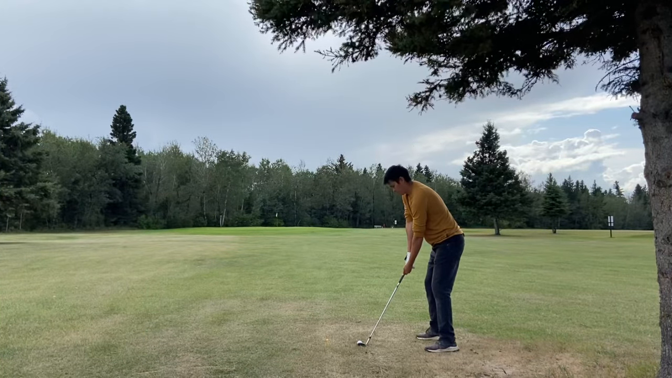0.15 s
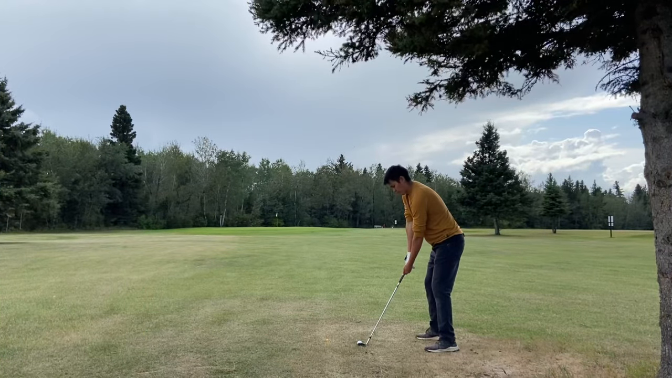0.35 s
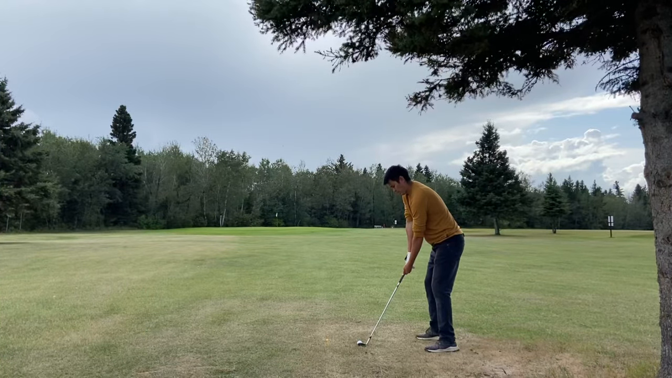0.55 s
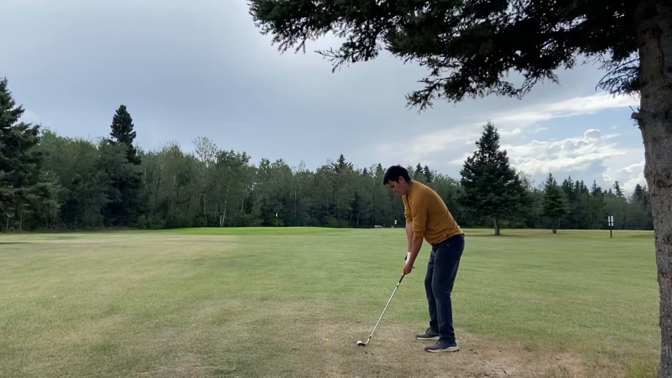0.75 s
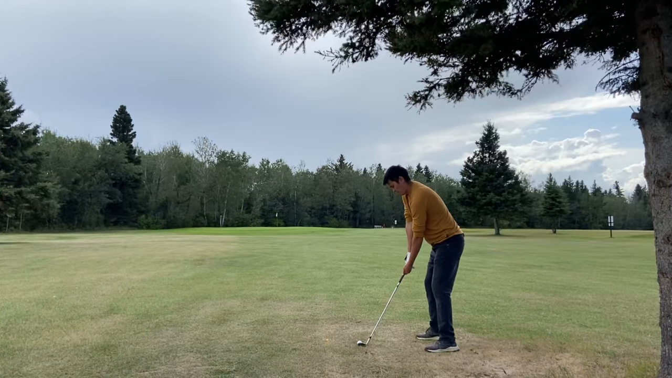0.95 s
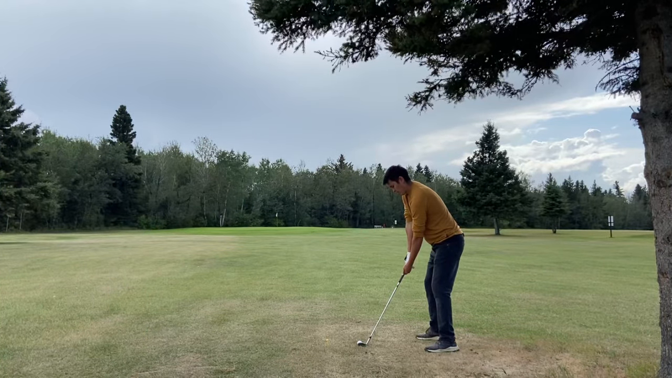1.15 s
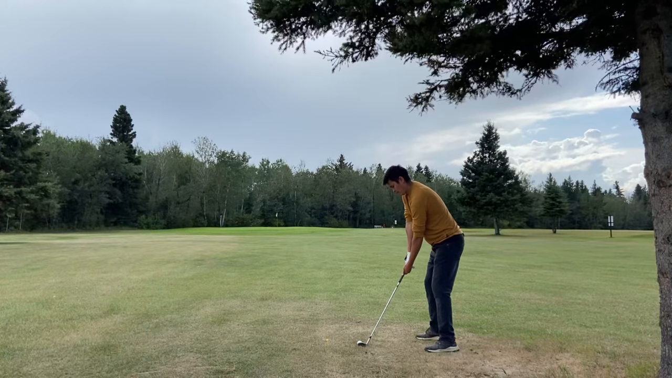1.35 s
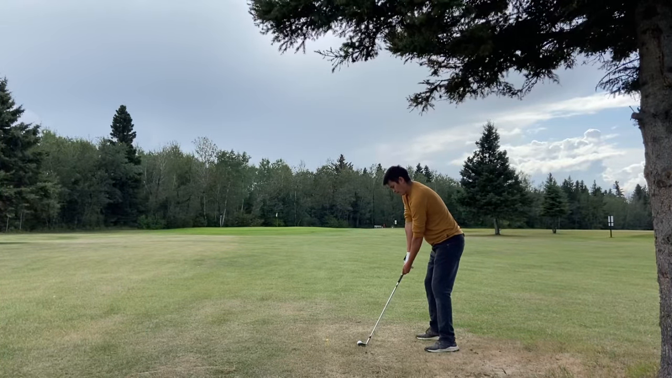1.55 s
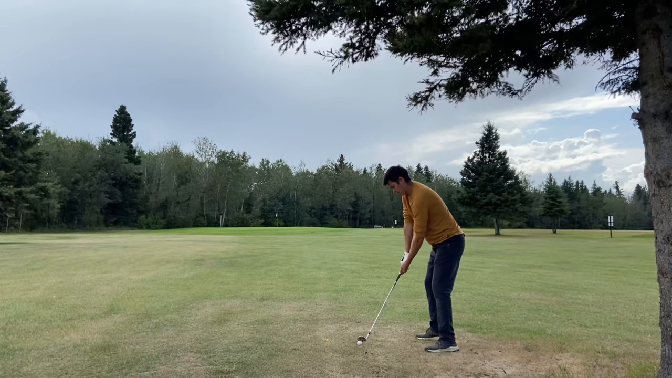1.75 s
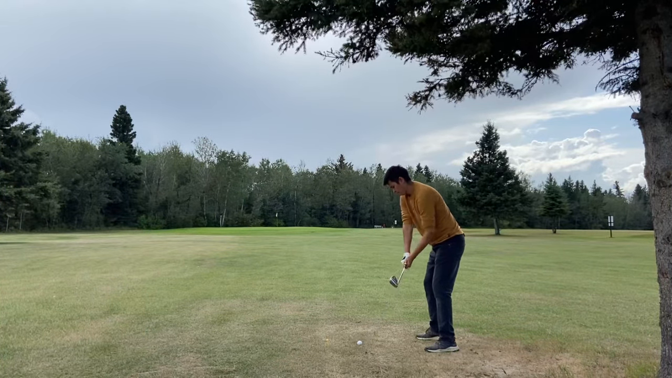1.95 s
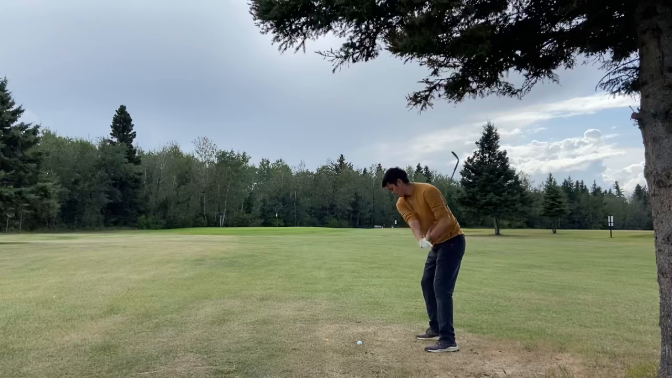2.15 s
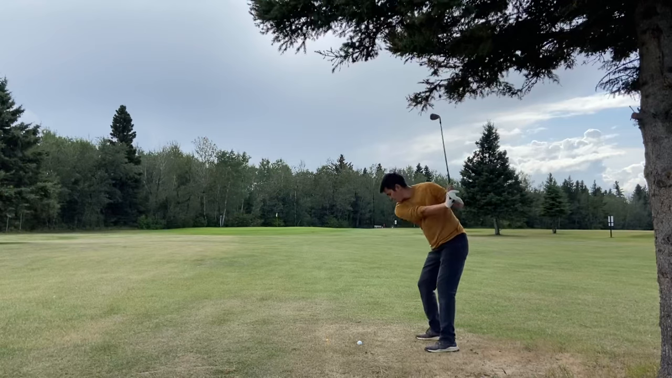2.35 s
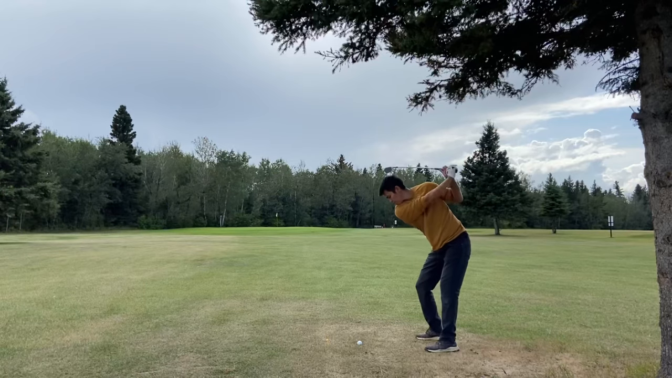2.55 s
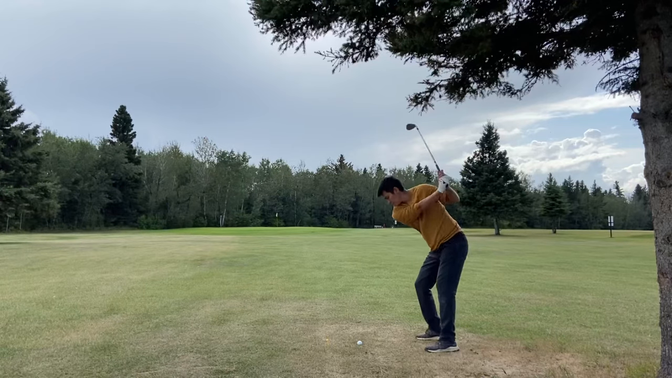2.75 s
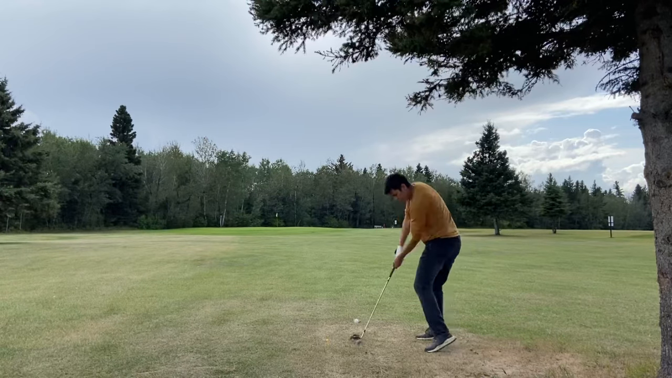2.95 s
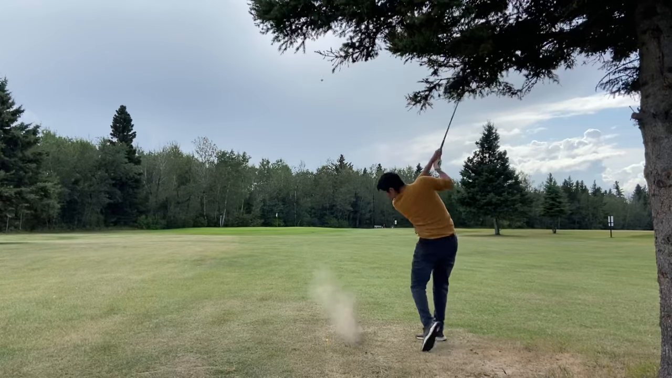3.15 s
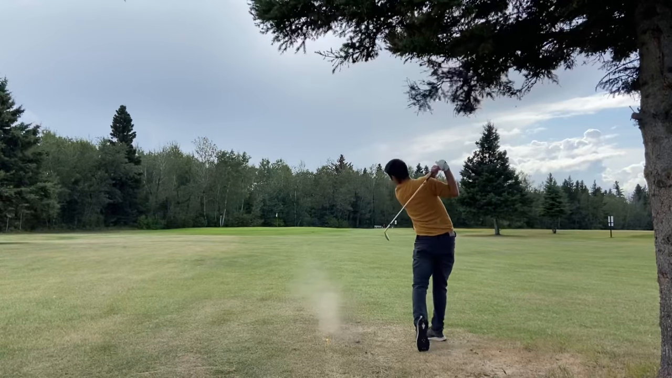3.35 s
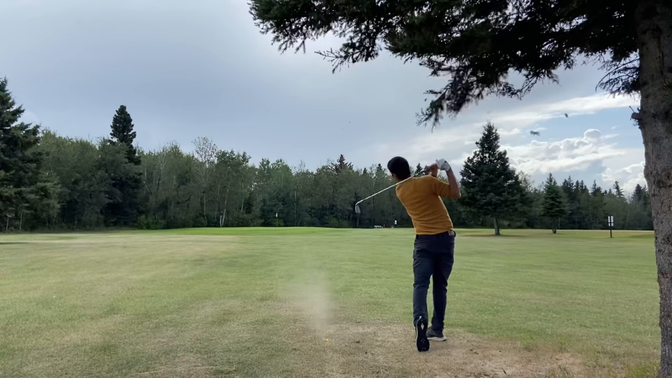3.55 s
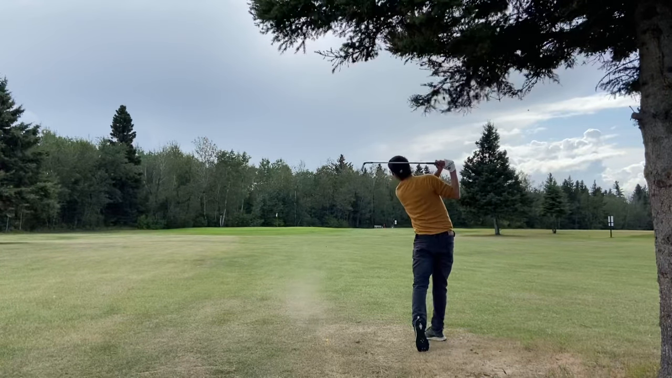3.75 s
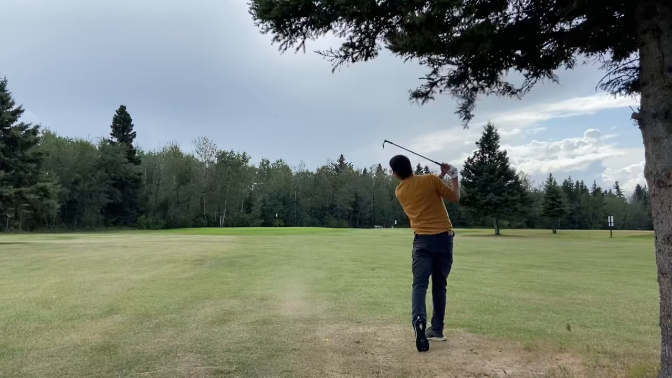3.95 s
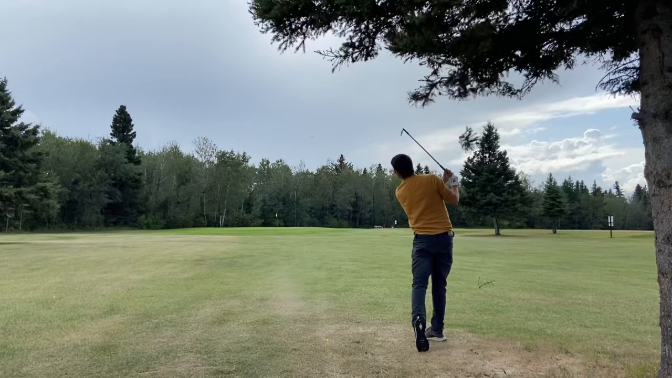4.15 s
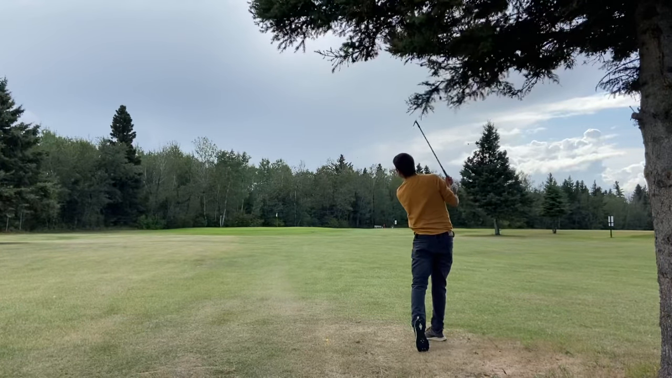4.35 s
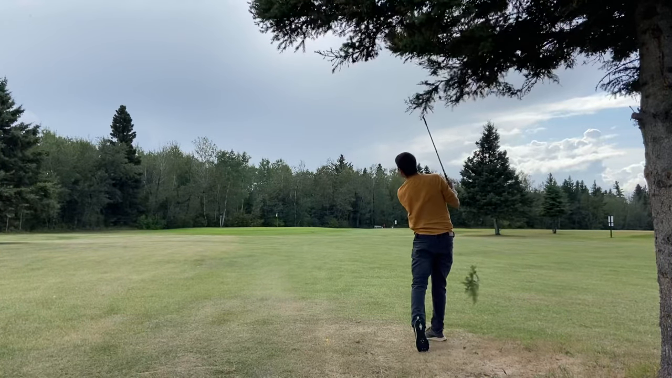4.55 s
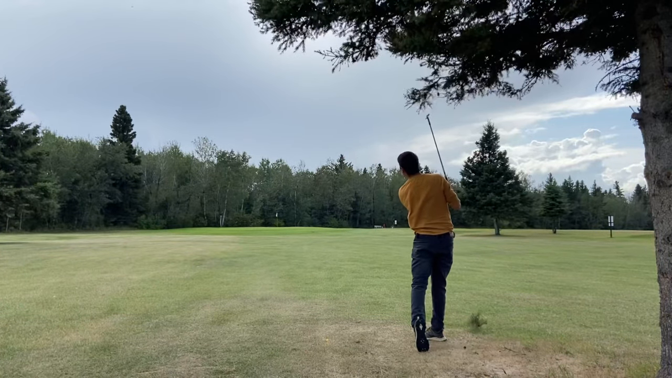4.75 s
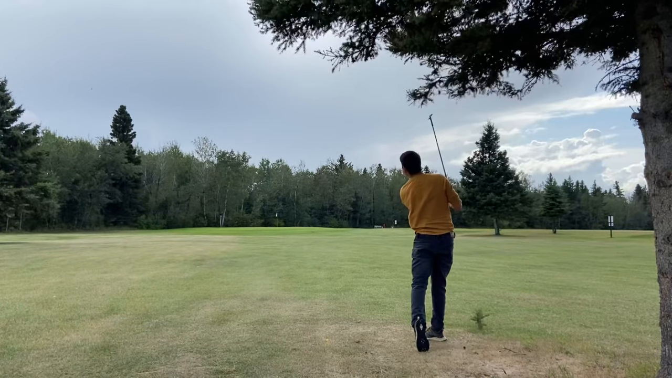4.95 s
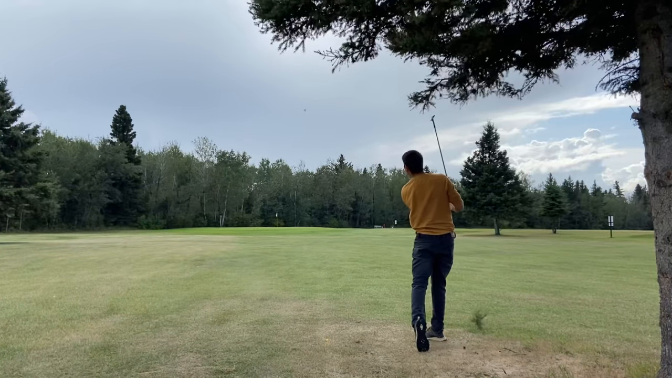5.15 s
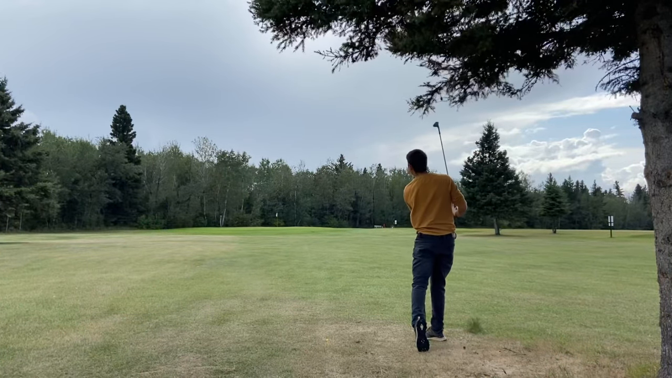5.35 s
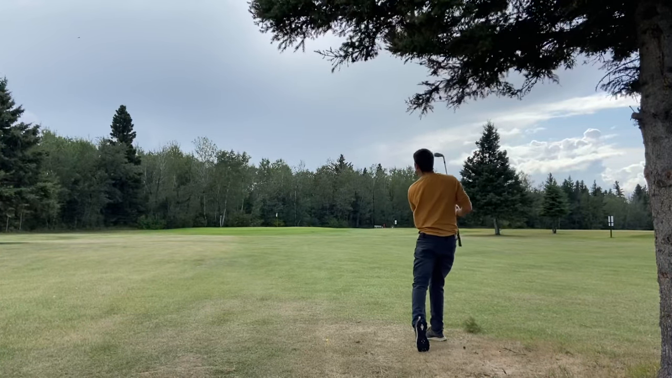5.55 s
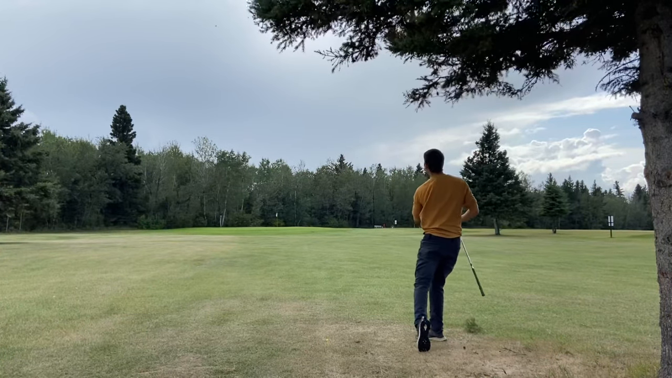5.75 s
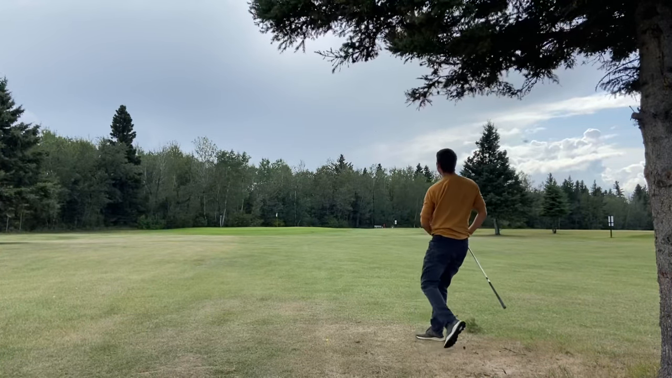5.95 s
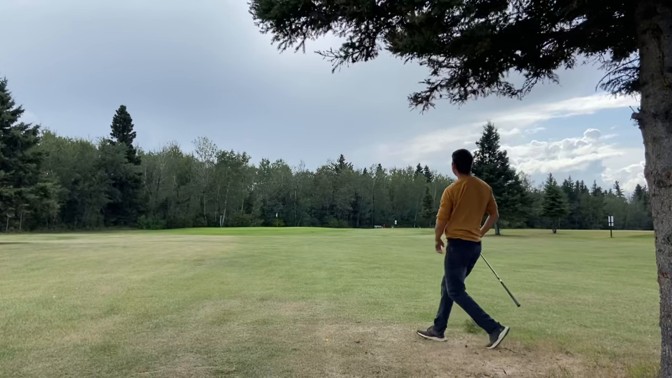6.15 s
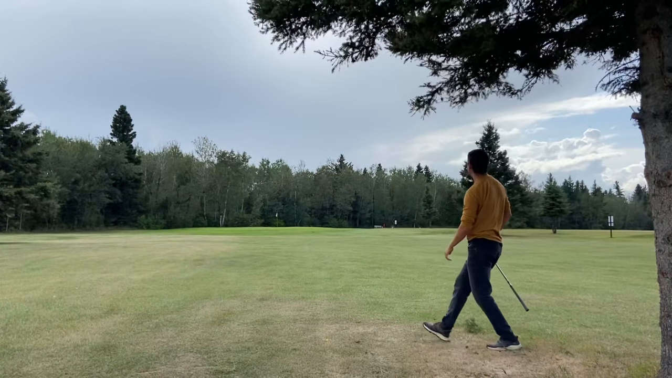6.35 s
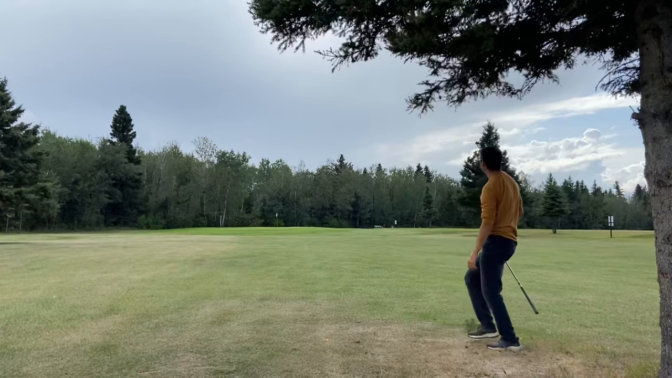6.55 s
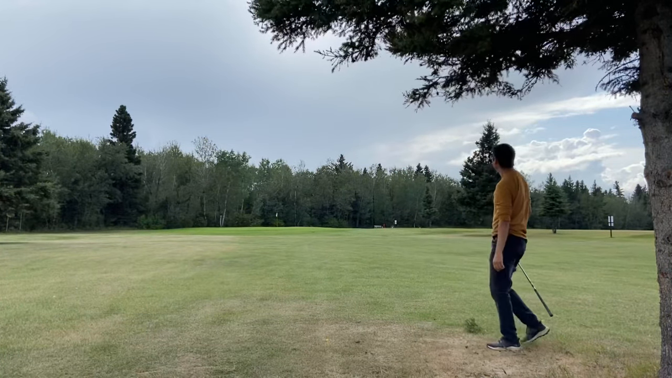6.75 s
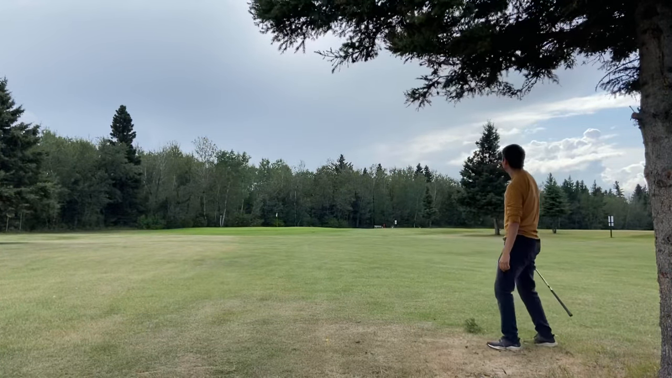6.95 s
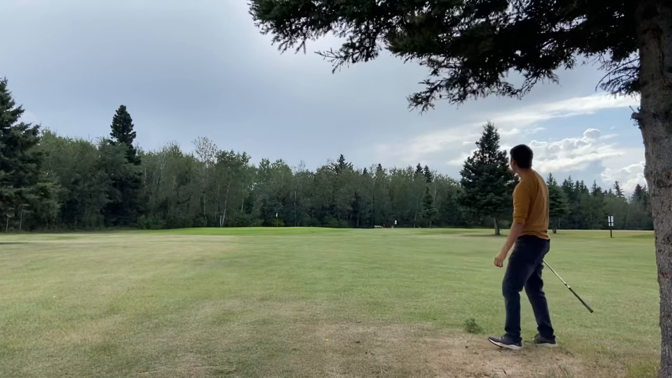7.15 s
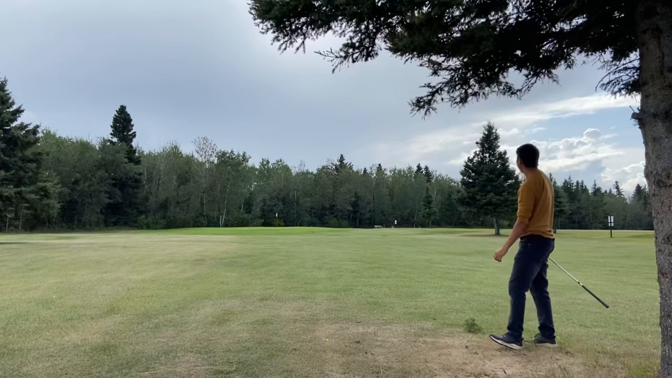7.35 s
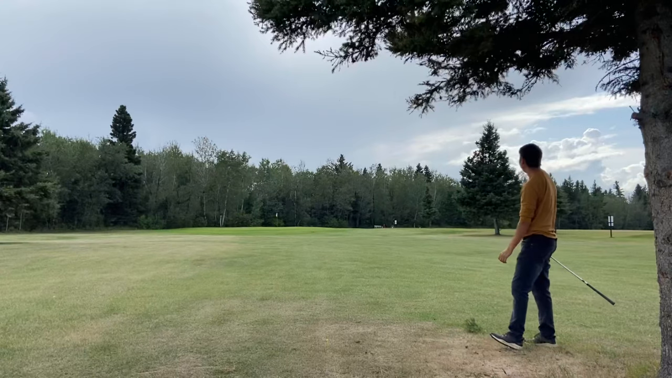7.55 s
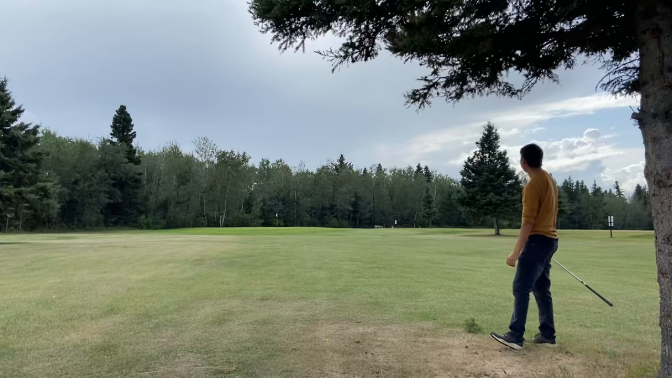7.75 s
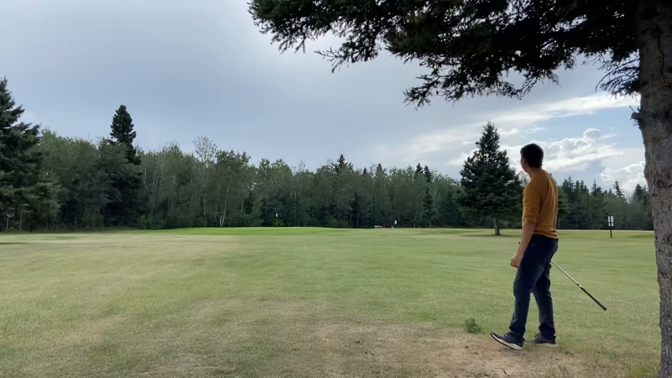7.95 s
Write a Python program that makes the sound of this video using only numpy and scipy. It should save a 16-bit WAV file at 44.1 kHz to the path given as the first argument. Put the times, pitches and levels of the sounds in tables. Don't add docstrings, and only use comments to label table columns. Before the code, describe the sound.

A quiet, windy open field beneath a spruce, heard from a few metres behind a golfer. Soft buffeting comes first, then a short rising swish, a hard, dry, slightly overloaded crack and a gritty spray of soil. Almost at once a woody snap and bright needle rattle answer from the tree. Falling debris ticks on dry litter, a strong low wind thump arrives later, and the breeze steadily swells.

```python
import sys
import numpy as np
from scipy import signal
from scipy.fft import rfft, irfft, next_fast_len
from scipy.io import wavfile
from scipy.ndimage import uniform_filter1d, map_coordinates

SR = 44100
rng = np.random.default_rng(int(sys.argv[2]) if len(sys.argv) > 2 else 0)


def wrap_up_sound(samples):
    columns = np.atleast_2d(samples).T
    tamed = np.clip(columns, -1, 1)
    steps = np.round(tamed * 32767).astype(np.int16)
    wavfile.write(sys.argv[1], SR, steps)


def gain_from_db(level_db):
    decades = np.asarray(level_db, float) / 20
    return 10 ** decades


N = 353152
CLOCK = np.arange(N) / SR
STRIKE_S = 2.9415


def unit(x):
    return x / np.sqrt(np.mean(x ** 2) + 1e-20)


def along(points, hz):
    f, value = np.transpose(points)
    return np.interp(np.log(hz + 1), np.log(f + 1), value)


def curve(points):
    s, value = np.transpose(points)
    return np.interp(CLOCK, s, value)


def wobble(rate):
    knots = rng.standard_normal(int(N * rate / SR) + 4)
    return map_coordinates(knots, [np.arange(N) * rate / SR])


def filtered(x, response):
    m = next_fast_len(N + 8192)
    return irfft(rfft(x, m) * response(np.fft.rfftfreq(m, 1 / SR)), m)[..., :N]


# hz, likeness (0 to 1)
ALIKE = [(30, .88), (80, .8), (300, .55), (1400, .32), (3000, .62), (5500, .7), (6800, .99), (16000, .99)]


def rush(spectrum, grain_db=0, grain_rate=300, spread=1, patchy_db=0):
    pair = rng.standard_normal((2, N))
    if patchy_db:
        z = signal.stft(pair, nperseg=512)[2]
        patches = uniform_filter1d(rng.standard_normal(z.shape[1:]), size=2, axis=0)
        patches = uniform_filter1d(patches, size=6, axis=1)
        pair = signal.istft(z * gain_from_db(patchy_db * unit(patches)), nperseg=512)[1][:, :N]
    if grain_db:
        pair = pair * gain_from_db(grain_db * wobble(grain_rate))

    def response(hz):
        turn = spread * np.arccos(np.clip(along(ALIKE, hz), 0, 1)) / 2
        return gain_from_db(along(spectrum, hz)) * [np.cos(turn), np.sin(turn)]

    mid, side = filtered(pair, response)
    return unit(np.array([mid + side, mid - side]))


def add(track, s, sound):
    track[round(s * SR):][:len(sound)] += sound


def swells(rows):
    power = np.zeros(N + 4 * SR)
    for s, db, half in rows:
        t = np.arange(-round(3 * half * SR), round(3 * half * SR)) / SR
        add(power, s + 2 + t[0], (gain_from_db(db) * np.exp(-(t / half) ** 2)) ** 2)
    return np.sqrt(power[2 * SR:][:N])


def bursts(rows):
    size, t = np.zeros(N + SR), np.arange(SR // 2) / SR
    for s, db, rise, t60 in rows:
        add(size, s, gain_from_db(db - 60 * t / t60) * (1 - np.exp(-t / rise)))
    return size[:N]


# pitch_hz, level_db, time to fall 60 dB decay_s
HEAD = [(7050, -3.5, 0.0079), (5600, -8.5, 0.011), (4230, -2.5, 0.01), (3550, -9.5, 0.027),
        (2734, -7, 0.025), (2120, -5, 0.022), (1690, -1, 0.021), (1400, 2, 0.017), (1060, -6, 0.025),
        (657, -20.5, 0.024), (448, -11, 0.027), (300, -11.5, 0.033), (158, -9.5, 0.045)]
# hz, level per hz_db
DIRT = [(80, -48), (300, 5.5), (1200, 4), (2500, 0.5), (4000, -2), (6000, -4), (10000, -3.5), (16000, -19)]
GRAZE_S, GRAZE_DB = .0045, -25
SPRAY_DB, SPRAY_RISE_S, SPRAY_T60_S, SPRAY_LASTS_S = -20, .001, .07, .043
DUST_DB, DUST_T60_S = -48.5, 0.72
GRIT_HZ, GRIT_WIDTH_HZ = 4000, 1200
GRIT_DB, GRIT_RISE_S, GRIT_T60_S = -25, .015, .17


def shot():
    blow, t = np.zeros(N), np.arange(SR // 10) / SR
    for hz, db, t60 in HEAD:
        start = STRIKE_S + .76 / hz
        add(blow, start, gain_from_db(db - 60 * t / t60) * np.sin(2 * np.pi * hz * t))
    crack = gain_from_db(-8 - 60 * t / .007) * rng.standard_normal(len(t))
    add(blow, STRIKE_S, crack)

    thrown = np.exp(-(np.maximum(CLOCK - STRIKE_S, 0) / SPRAY_LASTS_S) ** 4)
    graze = bursts([(STRIKE_S - GRAZE_S, GRAZE_DB, GRAZE_S / 2, SPRAY_T60_S)])
    spray = bursts([(STRIKE_S, SPRAY_DB, SPRAY_RISE_S, SPRAY_T60_S)])
    dust = bursts([(STRIKE_S, DUST_DB, SPRAY_RISE_S, DUST_T60_S)])
    dirt = rush(DIRT, grain_db=2.8, grain_rate=400, spread=.8, patchy_db=2)
    patter = filtered(dirt, lambda hz: 1 / np.hypot(1, 2 * (hz - GRIT_HZ) / GRIT_WIDTH_HZ))
    grit = thrown * bursts([(STRIKE_S, GRIT_DB, GRIT_RISE_S, GRIT_T60_S)]) * unit(patter)
    return blow * gain_from_db([[.3], [-.3]]) + (thrown * (graze + spray) + dust) * dirt + grit


# hz, level per hz_db
SWISH_TONE = [(60, -61), (300, -18), (800, 6), (1300, -4), (2500, -4), (5000, -10), (8000, -16),
              (16000, -23)]
FASTEST_S, SPEED_UP_S, SLOW_DOWN_S = 2.918, .075, .07
WHISTLE_HZ, WHISTLE_DB = 500, -43
WHISTLE_POWER, WHISTLE_CUT_T60_S = 3.5, .15
SWISH_DB, SWISH_FULL_S, SWISH_RISE_DB_PER_S = -47, 2.897, 520


def swing():
    after = np.maximum(CLOCK - STRIKE_S, 0)
    ease = np.where(CLOCK < FASTEST_S, SPEED_UP_S, SLOW_DOWN_S)
    speed = np.exp(-((CLOCK - FASTEST_S) / ease) ** 2)
    whistle_db = WHISTLE_DB - 60 * after / WHISTLE_CUT_T60_S + 3 * wobble(90)
    pitch_hz = WHISTLE_HZ * speed + 22 * wobble(80)
    whistle = gain_from_db(whistle_db) * speed ** WHISTLE_POWER * np.sin(2 * np.pi * np.cumsum(pitch_hz) / SR)
    swish_db = SWISH_DB + SWISH_RISE_DB_PER_S * np.minimum(CLOCK - SWISH_FULL_S, 0) - 60 * after / .015
    return whistle * gain_from_db([[.3], [-.3]]) + gain_from_db(swish_db) * rush(SWISH_TONE, spread=0.24)


# start_s, peak level_db, pitch_hz
SNAPS = [(3.1165, -25, 2420), (3.1183, -12, 1290), (3.119, -20.5, 865), (3.1195, -26.5, 675),
         (3.12, -22, 5000), (3.1213, -18.5, 1150), (3.122, -23, 260), (3.124, -32, 418), (3.135, -32, 2500),
         (3.167, -39.5, 2000), (3.191, -39, 3000)]
# start_s, level_db, rise_s, time to fall 60 dB decay_s
BOUGHS = [
    (3.1158, -18, .003, 0.056),
    (3.129, -27.5, .004, 0.12),
    (3.159, -29.5, .006, 0.17),
    (3.185, -40.5, .006, 0.19),
    (3.24, -44, 0.01, 0.24),
    (3.318, -43, 0.0056, 0.13),
    (3.35, -66, 0.023, 0.65),
]
# hz, level per hz_db
NEEDLE_TONE = [(100, -55), (400, 1), (1500, -2), (4000, -0.5), (7000, 0), (11000, 3.5), (16000, 1.5)]
SHED_DB, SHED_ENDS_S, SHED_FADE_S = -64.5, 4.02, .02


def spruce():
    wood, t = np.zeros(N), np.arange(SR // 20) / SR
    for s, db, hz in SNAPS:
        click = 1.74 * gain_from_db(-60 * t / 0.0032) * rng.standard_normal(len(t))
        ring_t60 = 0.0055 + 6 / hz
        ring = gain_from_db(-60 * t / ring_t60) * np.sin(2 * np.pi * hz * t)
        add(wood, s, gain_from_db(db) * (click + ring))
    fade = (1 - np.tanh((CLOCK - SHED_ENDS_S) / SHED_FADE_S)) / 2
    shed = gain_from_db(SHED_DB) * (CLOCK > BOUGHS[0][0]) * fade
    needles = rush(NEEDLE_TONE, grain_db=1.8, grain_rate=700, spread=.45)
    return wood + (bursts(BOUGHS) + shed) * needles


# start_s, level_db, rise_s, time to fall 60 dB decay_s
TICKS = [(.89, -65, .006, 0.21), (1.65, -61, 0.00091, 0.037), (1.74, -69, .01, .3),
         (2.24, -61, 0.021, 0.27), (4.255, -43, .001, 0.033), (4.27, -62, .01, 0.48), (4.6, -55, .02, 0.3),
         (4.639, -57, .002, 0.34), (5.98, -47, 0.0011, 0.043), (5.99, -64, .01, 0.8),
         (6.17, -70, 0.0033, .1)]
# hz, level per hz_db
DRY = [(1500, -40), (4000, -16), (7000, 0.5), (11000, 1), (15000, -0.5), (16000, -5)]


def litter():
    return bursts(TICKS) * rush(DRY, grain_db=3.0, grain_rate=500, spread=0.46)


# centre_s, peak level_db, pitch_hz, length_cycles
EDDIES = [(0.557, -23.5, 159, 0.65), (1.502, -17, 74, 0.63), (2.359, -30, 151, 0.81),
          (2.699, -23.5, 199, 0.4), (3.011, -20.5, 65, 0.58), (3.193, -25.5, 195, 0.7),
          (3.234, -26.5, 108, 0.94), (4.226, -18.5, 90.5, 1.4), (4.555, -27.5, 200, 0.47),
          (4.896, -24, 95, .9), (5.365, -33, 420, .7), (5.392, -30, 300, .8), (5.411, -17, 135, 0.71),
          (5.45, -32, 450, .8), (5.485, -36, 400, 0.59), (5.499, -31, 247, 0.72), (5.53, -22, 86.3, 1.02),
          (5.62, -31, 171, 1.05), (6.48, -23, 96, 1.1), (6.56, -22, 105, 1), (6.655, -11, 80.4, 1.04),
          (7.257, -32, 250, 0.76), (7.263, -20, 101, 0.76)]
# time_s, pressure_db
WIND = [(0, -35.5), (.3, -38), (.7, -42), (1.25, -45), (1.5, -34.5), (1.8, -46.5), (2.25, -34),
        (2.45, -36.5), (2.56, -48), (2.9, -44.5), (3.05, -37.5), (3.8, -40), (4.6, -40), (5.3, -41),
        (5.9, -45), (6.55, -30.5), (7.4, -45.5), (8.01, -34)]
# centre_s, rumble_db, half_length_s, flutter over rumble_db
PUFFS = [(0.071, -32.5, .05, -4), (0.215, -36.5, 0.045, -1), (0.289, -38, 0.04, 2.5),
         (0.423, -36.5, 0.025, 0), (0.564, -36, 0.023, -1), (0.822, -42, 0.036, -10),
         (1.329, -33, 0.027, -7), (1.496, -29, 0.047, -3.5), (1.676, -35, 0.024, -10),
         (2.007, -38, 0.023, -12), (2.27, -41.5, 0.038, 4.5), (2.363, -32, 0.028, 7),
         (2.626, -36, 0.041, -1.5), (2.696, -31, .012, -8), (3.207, -33.5, 0.05, -0.5),
         (4.227, -24.5, .035, -5), (4.42, -36, 0.034, -5), (4.533, -32, 0.023, -11), (4.753, -40, .04, -15),
         (4.896, -29, 0.032, -5.5), (5.405, -36, 0.019, 12), (5.523, -32.5, 0.057, -15),
         (5.626, -30.5, 0.037, -6), (5.768, -31.5, .025, -21), (5.852, -39, .03, -7),
         (6.011, -35, 0.034, -3), (6.654, -18, 0.016, -11), (6.704, -31, 0.055, 3.5),
         (6.897, -31.5, 0.024, -15), (7.259, -36, .025, 2)]
# hz, level per hz_db
RUMBLE = [(20, -38), (41, -3), (70, -1), (86, -2.5), (119, -6.5), (200, -23), (260, -30), (440, -120)]
# hz, level per hz_db
FLUTTER = [(25, -82), (60, -46), (130, 1), (250, -5), (400, -16), (700, -48.5), (2000, -100)]
FLUTTER_DB, FLUTTER_GROWS, CALM_DB = -51.5, 1.22, -42.5
LUMP_DB, LUMP_RATE = 2.5, 9
EDDY_SAG = .35


def buffeting():
    wind_db = curve(WIND) + LUMP_DB * wobble(LUMP_RATE)
    deep_puffs = swells([(s, db, half) for s, db, half, _ in PUFFS])
    flutter_puffs = swells([(s, db + bite, 0.71 * half) for s, db, half, bite in PUFFS])
    deep_size = np.hypot(gain_from_db(wind_db), deep_puffs)
    flutter_size = np.hypot(gain_from_db(FLUTTER_DB + FLUTTER_GROWS * (wind_db - CALM_DB)), flutter_puffs)
    deep = deep_size * rush(RUMBLE, grain_db=1.0, grain_rate=22)
    flutter = flutter_size * rush(FLUTTER, grain_db=4.0, grain_rate=36)

    swings, t = np.zeros(N), np.arange(-SR // 10, SR // 10) / SR
    for s, db, hz, cycles in EDDIES:
        bell = np.exp(-(t * hz / cycles) ** 2)
        stretch = 1 - EDDY_SAG / 2 * np.tanh(hz * t)
        add(swings, s - 1 / 10, -gain_from_db(db) * bell * np.cos(2 * np.pi * hz * t * stretch))
    return deep + flutter + swings * gain_from_db([[.4], [-.4]])


# time_s, strength_db
BREEZE = [(0, -12.5), (.4, -20), (1.4, -24), (1.75, -14), (2.15, -19.5), (2.75, -18.5), (3.2, -12.5),
          (3.9, -10.5), (5.1, -4), (5.7, 0), (6.5, 0.5), (6.9, -0.5), (7.15, -0.5), (8.01, 2.5)]
# time_s, strength_db
FAR_WIND = [(0, -55), (.65, -57), (1.7, -52.5), (2.7, -50), (3.7, -48.5), (5.1, -46.5), (5.75, -48),
            (6.8, -44), (8.01, -46)]
# centre_s, needle fizz_db, half_length_s
STIRS = [
    (3.3, -67, 0.23),
    (3.75, -73, 0.21),
    (6.2, -72, .15),
    (6.82, -73, 0.18),
    (7.6, -68, 0.48),
    (8.05, -67, .25),
]
# hz, level per hz_db
ROAR = [(30, -67), (100, -24.5), (250, 2), (500, -4), (1000, -3.5), (1500, -10.5), (2500, -19.5),
        (16000, -93)]
# hz, level per hz_db
RUSTLE = [(300, -62.5), (900, -12.5), (1500, 0.5), (2500, -2), (3200, -6.5), (4500, -11.5), (6000, -25),
          (16000, -71.5)]
# hz, level per hz_db
HISS = [(1000, -62.5), (3000, -3), (4500, 1.5), (6500, -0.5), (8000, -2.5), (10500, -14), (16000, -62.5)]
# hz, level per hz_db
FIZZ = [(2500, -69), (5000, -18), (8000, 7), (11000, 1), (12500, -6), (14000, -6), (14800, -22),
        (16000, -33)]
HISS_DB, RUSTLE_DB, RUSTLE_GROWS = -59.5, -51.5, 0.36
FIZZ_DB, FIZZ_GROWS = -78.5, 0.065


def trees():
    breeze_db = curve(BREEZE)
    gust_db = 0.47 * wobble(3.06)
    roar = gain_from_db(curve(FAR_WIND) + gust_db) * rush(ROAR, patchy_db=1.8) * gain_from_db([[.4], [-.4]])
    rustle = gain_from_db(RUSTLE_DB + RUSTLE_GROWS * breeze_db + gust_db) * rush(RUSTLE, patchy_db=1.77)
    hiss = gain_from_db(HISS_DB + breeze_db + gust_db) * rush(HISS, patchy_db=2.0)
    fizz_size = np.hypot(gain_from_db(FIZZ_DB + FIZZ_GROWS * breeze_db), swells(STIRS))
    fizz = fizz_size * rush(FIZZ, grain_db=0.5, grain_rate=32)
    return roar + rustle + hiss + fizz


# centre_s, level_db, half_length_s
CARRIES = [
    (0, -55, 0.35),
    (2.1, -51.5, 0.62),
    (3.4, -54, 0.62),
    (5.25, -53.5, .2),
    (6.25, -51, 0.3),
    (7.9, -57, 0.37),
]
HUM_HZ, HUM_DB = 285.5, -65


def engine():
    size = np.hypot(gain_from_db(HUM_DB), swells(CARRIES)) * gain_from_db(2.3 * wobble(6.3))
    pitch_hz = HUM_HZ + 1.793 * wobble(1.5) + 1.51 * wobble(17)
    return size * np.sin(2 * np.pi * np.cumsum(pitch_hz) / SR)


def scene():
    return shot() + swing() + spruce() + litter() + buffeting() + trees() + engine()


def band_limit(x):
    return signal.sosfilt(signal.butter(12, 16380, fs=SR, output="sos"), x)


# hz, phase_radians
LEAD = [(200, 0), (1400, .5), (3000, .3), (6800, 0)]
TURN_HZ, SPREAD_S = 6800, 1 / 4400
LOW_CUT_HZ, TOP_HZ = 26.3, 15750


def record(dry):
    def response(hz):
        half_lead = along(LEAD, hz) / 2 - np.pi * np.maximum(hz - TURN_HZ, 0) * SPREAD_S
        band = (hz / (hz - 1j * LOW_CUT_HZ)) ** 2 / (1 + (hz / TOP_HZ) ** 120)
        return np.exp(1j * np.outer([1, -1], half_lead)) * band

    steered = filtered(dry, response)
    clipped = steered / (1 + np.abs(steered / 1.05) ** 6) ** (1 / 6)
    return band_limit(clipped)


dry = scene()
out = record(dry)
wrap_up_sound(out)
```